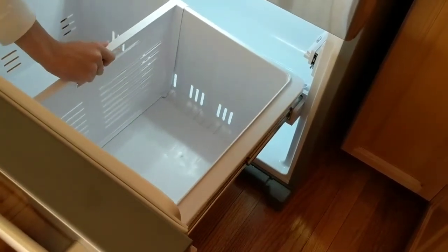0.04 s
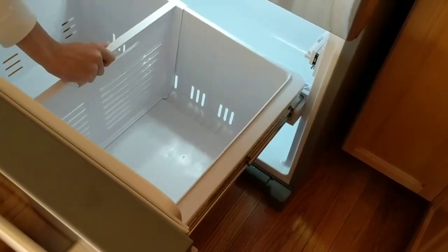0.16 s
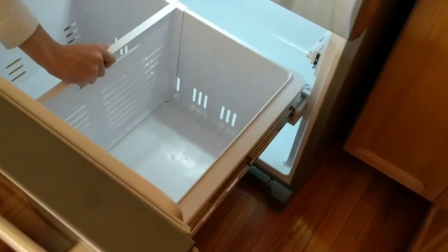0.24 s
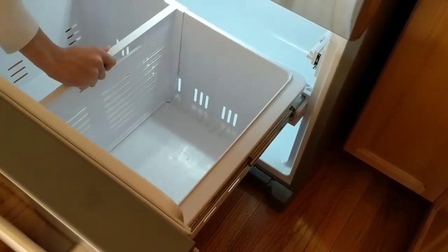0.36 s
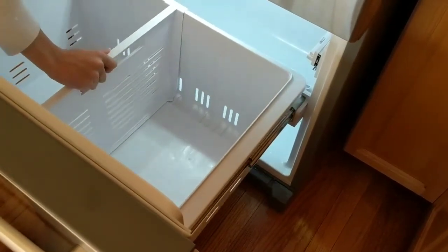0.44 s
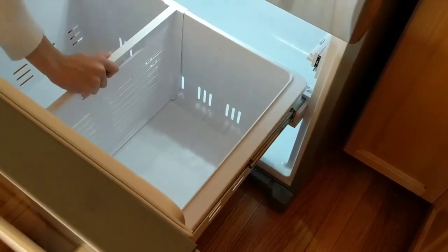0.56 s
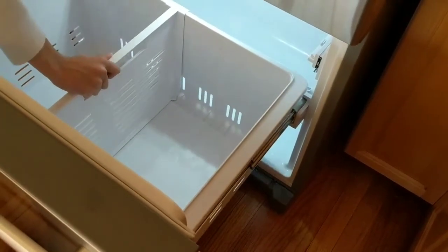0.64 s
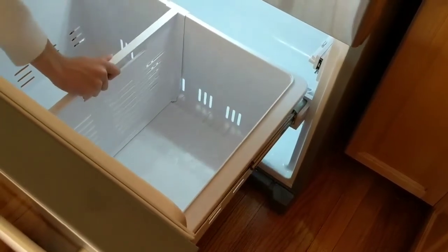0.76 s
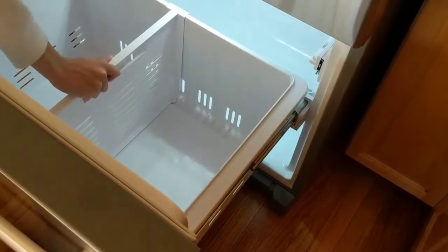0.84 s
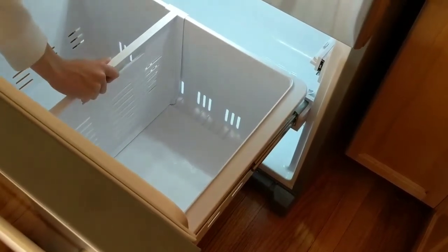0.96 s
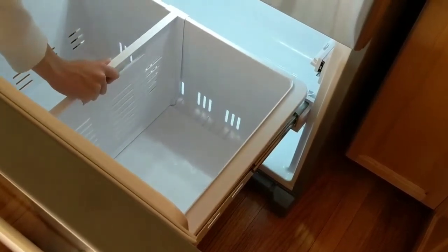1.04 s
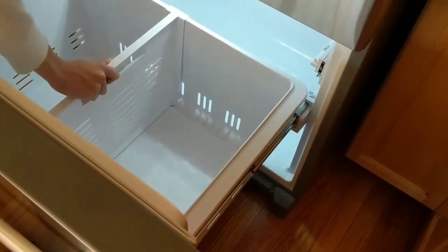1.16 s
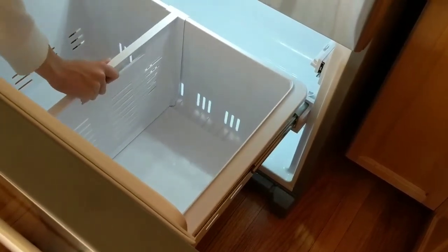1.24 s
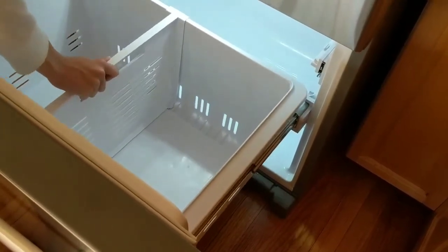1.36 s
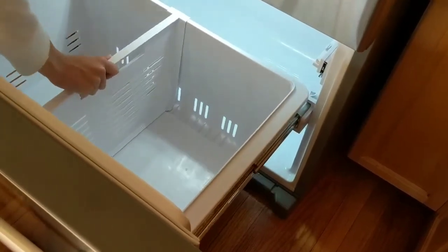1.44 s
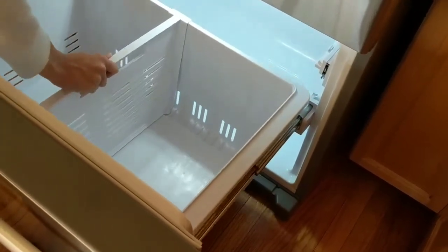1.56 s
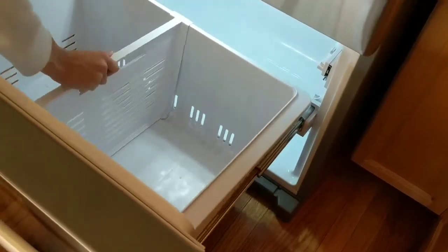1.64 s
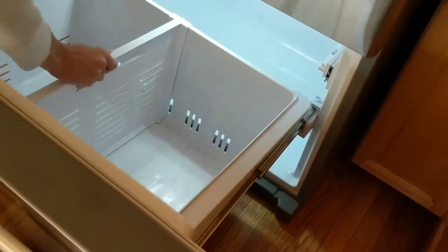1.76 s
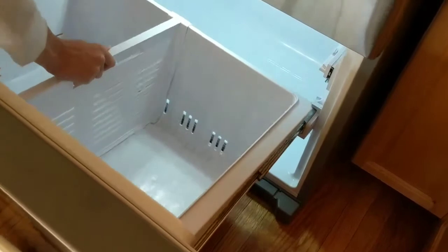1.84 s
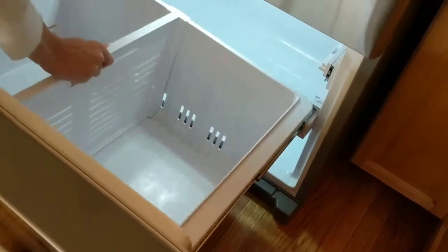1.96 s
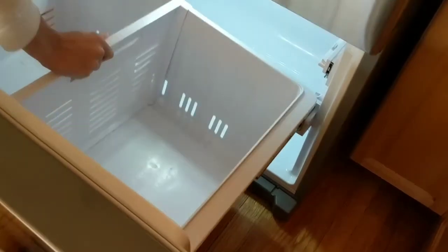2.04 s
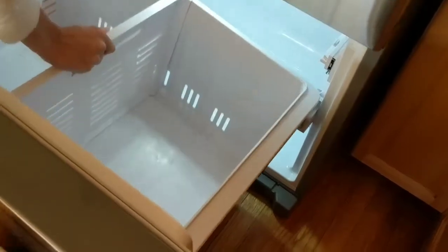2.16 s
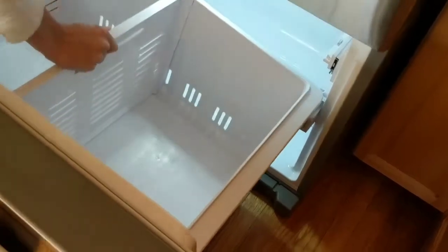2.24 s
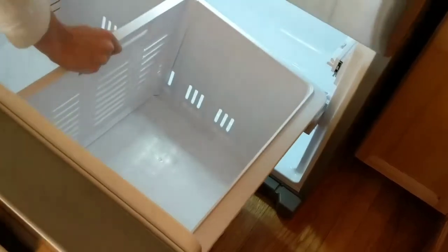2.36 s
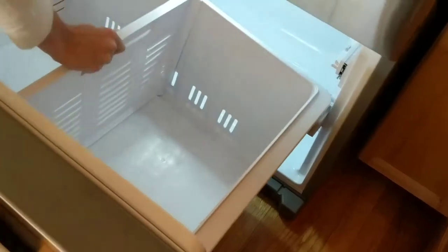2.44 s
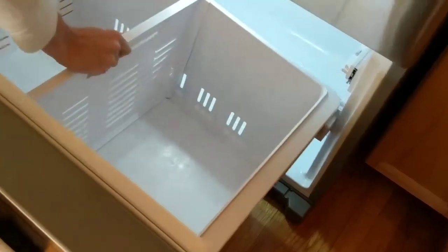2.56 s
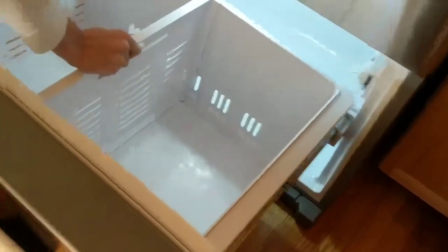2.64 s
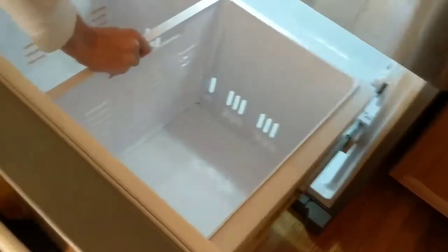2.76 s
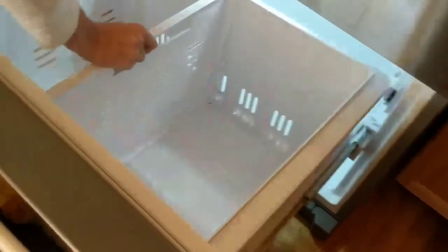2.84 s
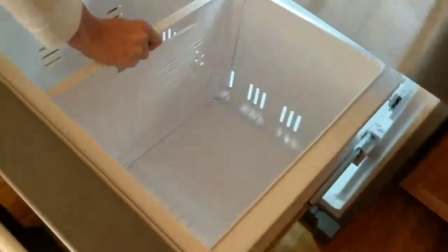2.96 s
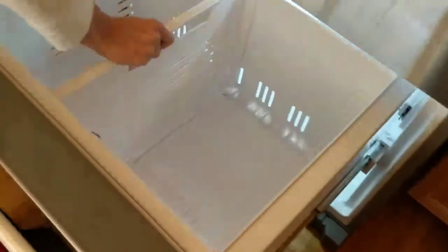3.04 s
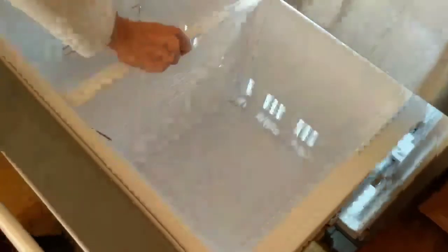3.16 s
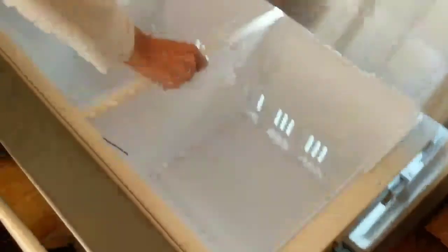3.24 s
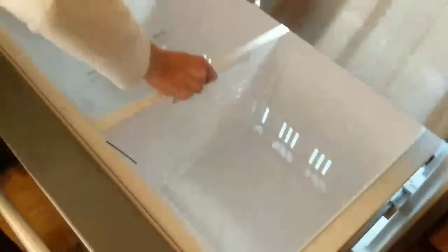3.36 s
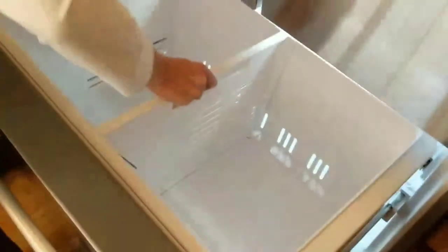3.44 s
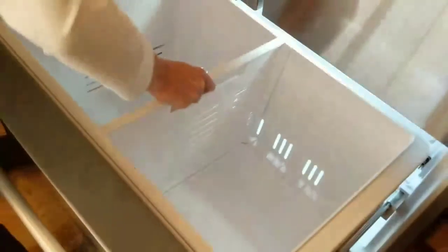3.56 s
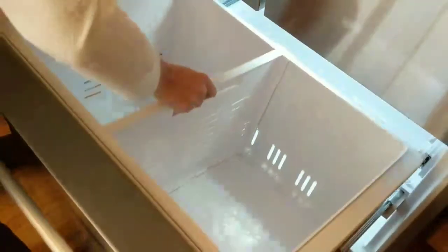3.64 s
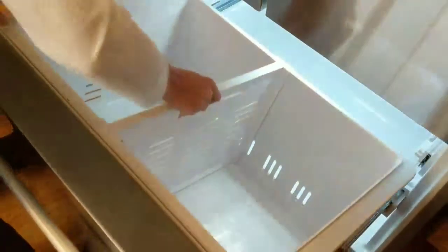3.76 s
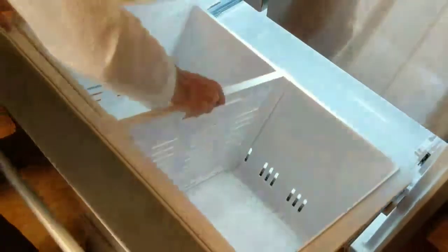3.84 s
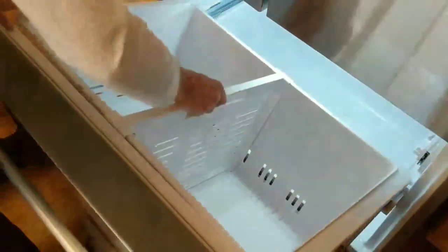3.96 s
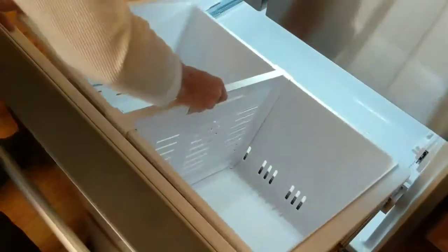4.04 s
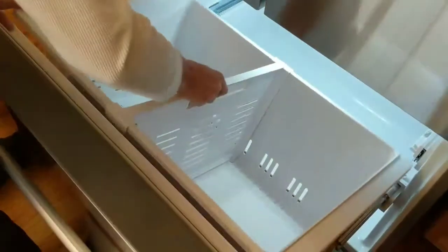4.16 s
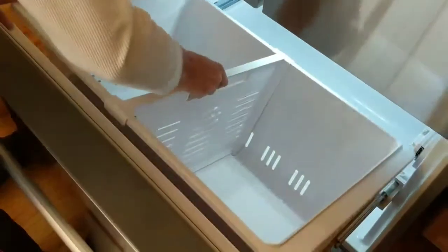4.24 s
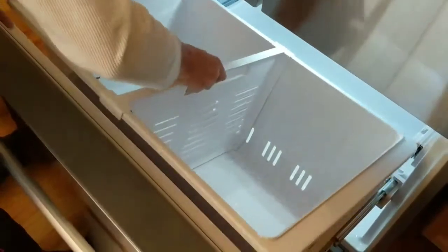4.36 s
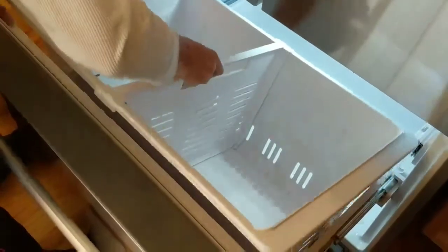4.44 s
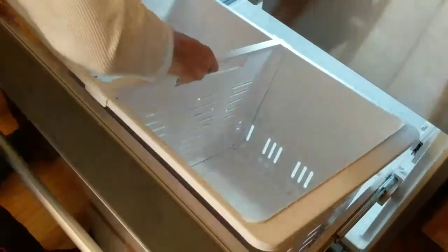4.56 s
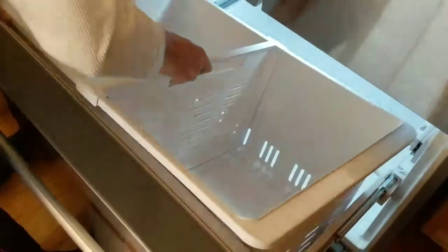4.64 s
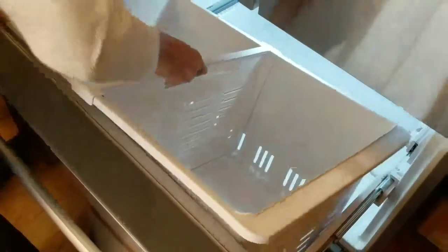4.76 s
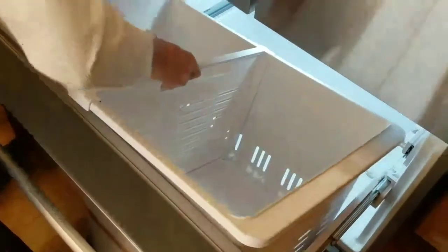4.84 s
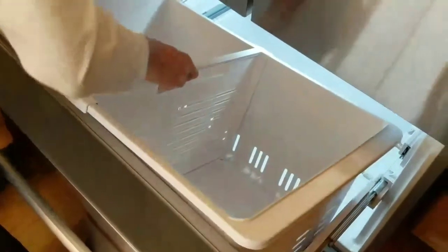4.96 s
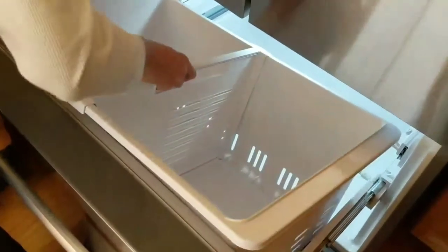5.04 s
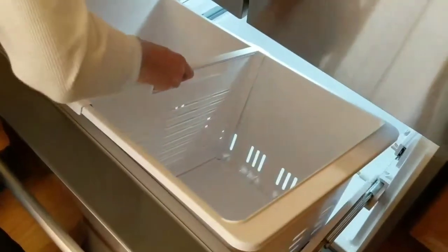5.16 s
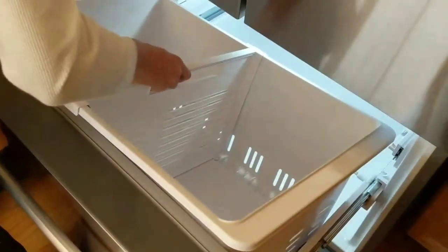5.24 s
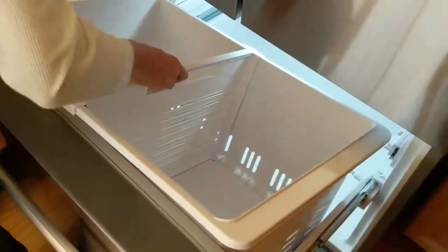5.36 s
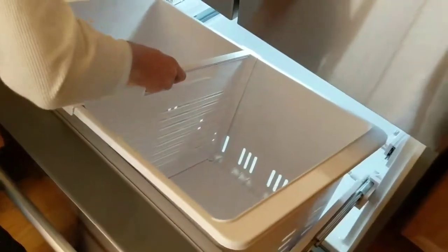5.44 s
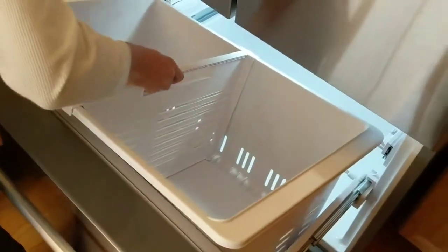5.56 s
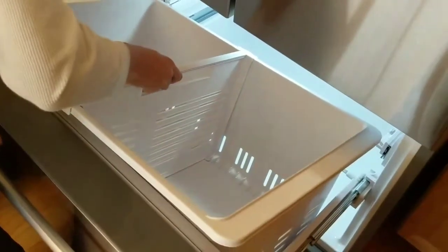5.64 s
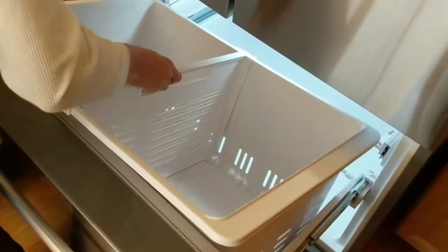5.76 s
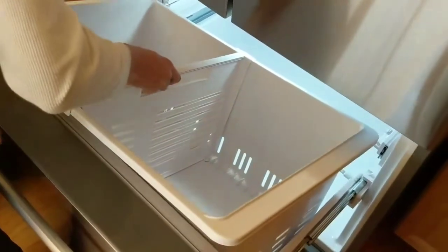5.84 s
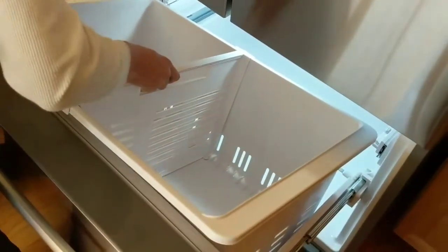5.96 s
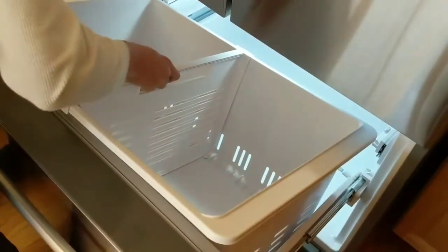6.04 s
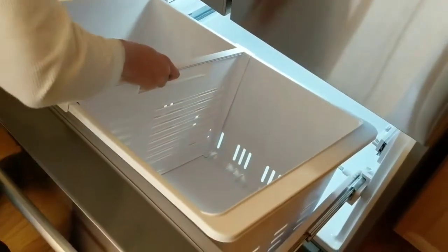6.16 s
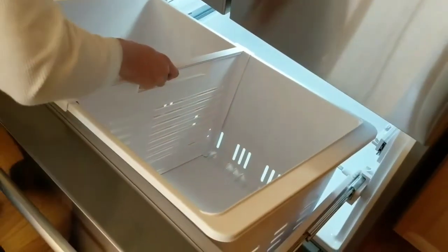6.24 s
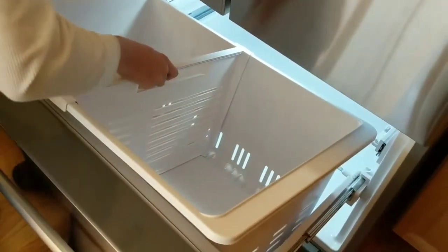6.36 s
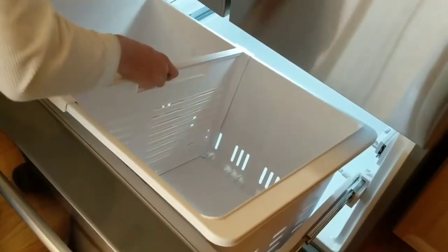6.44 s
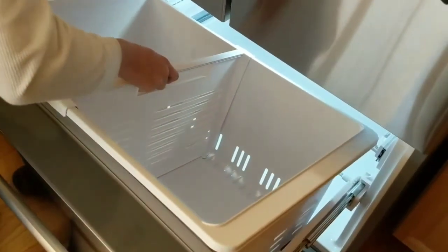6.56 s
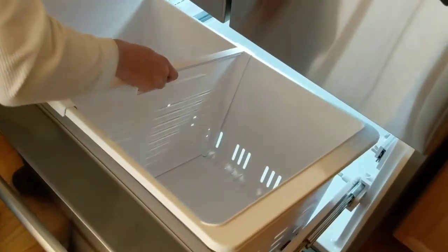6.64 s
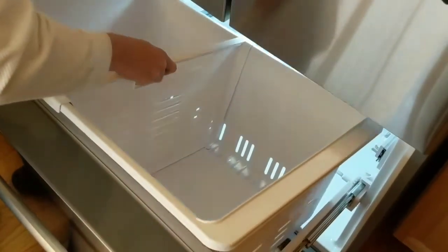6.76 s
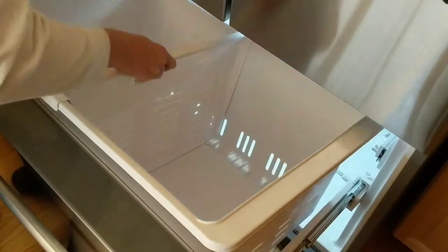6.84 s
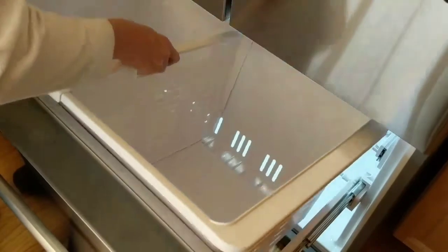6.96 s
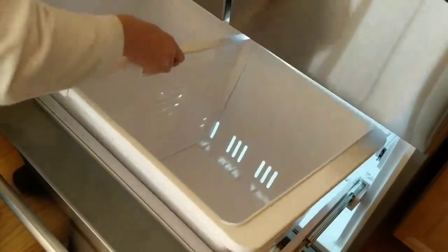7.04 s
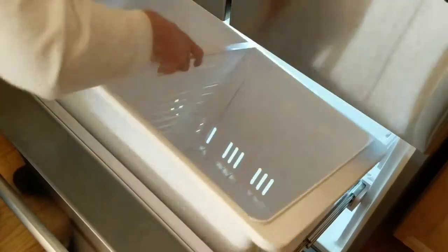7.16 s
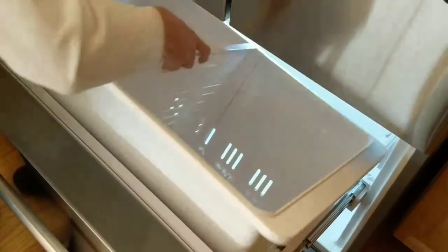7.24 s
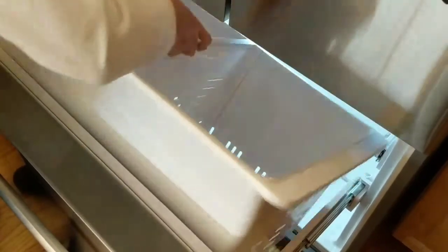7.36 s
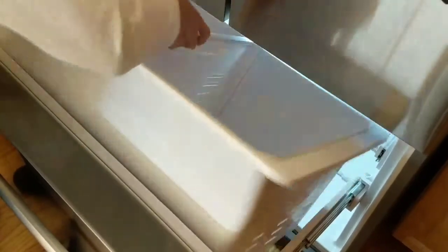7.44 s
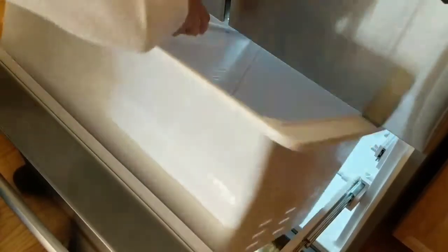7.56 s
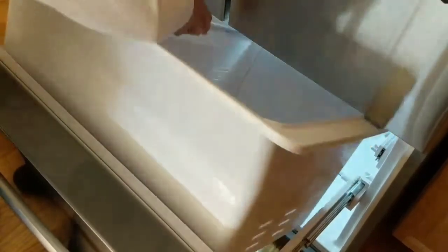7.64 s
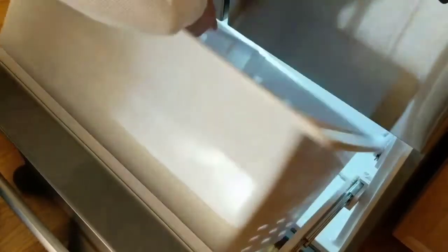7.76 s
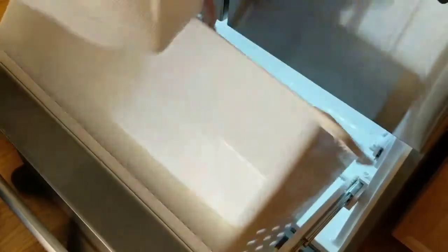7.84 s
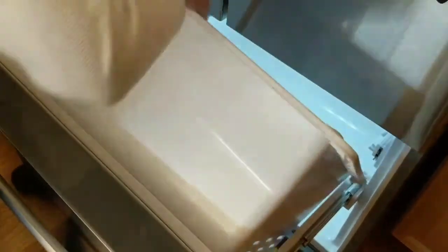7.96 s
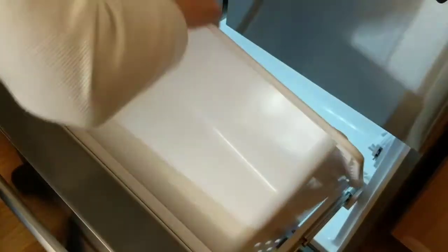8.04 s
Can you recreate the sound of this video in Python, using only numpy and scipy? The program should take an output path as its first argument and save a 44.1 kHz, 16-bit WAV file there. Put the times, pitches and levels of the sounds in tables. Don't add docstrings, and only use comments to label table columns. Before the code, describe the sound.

Close by in a small kitchen, a big plastic freezer basket is worked in its drawer frame. One hard knock comes early, then a rattling rock, a clattering pull and several hollow thumps. Light ticks and quiet rubbing fill a calmer stretch before a tilt and a dense, loud clatter as it lifts out. Faint compressor hum and soft fan air continue beneath.

```python
import sys
import numpy as np
from scipy import signal
from scipy.fft import rfft, irfft, next_fast_len
from scipy.io import wavfile
from scipy.ndimage import uniform_filter1d, map_coordinates

SR = 44100
rng = np.random.default_rng(int(sys.argv[2]) if len(sys.argv) > 2 else 0)


def master(y):
    cut = np.clip(np.atleast_2d(y).T, -1, 1)
    pcm = np.round(cut * 32767)
    wavfile.write(sys.argv[1], SR, pcm.astype(np.int16))


def how_loud(loudness_db):
    steps = np.asarray(loudness_db, float) / 20
    return 10 ** steps


N = 356901

# (time [s], crack peak [dB], brightness [dB], loudest rim tone [Hz])
KNOCKS = [(0.29, -36.5, -41, 970), (0.329, -21, -8, 1347), (1.813, -38, -34, 800), (1.901, -35, -11, 780),
          (1.935, -23.5, -30, 796), (2.339, -35.5, -10.5, 1650), (2.394, -32, -44, 800),
          (2.481, -35.5, -21.5, 885), (2.632, -39.5, -18.5, 1700), (2.72, -34.5, -8.5, 1610),
          (2.958, -33, -16, 1030), (3.098, -39.5, -23, 805), (3.641, -38.5, -18.5, 1080),
          (4.046, -38.5, -3, 1110), (4.055, -28.5, -13.5, 1987), (4.294, -36, -16.5, 1163),
          (4.437, -26, -12.5, 1536), (4.479, -39, -10, 1130), (4.496, -26, -14.5, 1630),
          (4.529, -35, -13.5, 1420), (4.623, -33, -20, 1700), (5.309, -39.5, -11.5, 1240),
          (5.333, -36, -14.5, 1047), (6.791, -31, -34, 1340), (6.873, -34, -12, 1630),
          (7.561, -24.5, -21.5, 1340), (7.648, -22, -10.5, 897), (7.637, -28, -18, 1030),
          (7.661, -27.5, -8, 1860), (4.564, -36.5, -27, 990)]
# (time [s], crack peak [dB], brightness [dB], loudest rim tone [Hz])
SCUFFS = [(0.096, -34, -18.5, 790), (0.715, -40, -16.5, 1760), (1.303, -55.5, -9.5, 1086),
          (1.618, -48.5, -16, 1630), (1.831, -41.5, -8.5, 816), (1.911, -32, -9.5, 1530),
          (2.846, -38.5, -15, 1520), (3.551, -39, -19.5, 1237), (4.025, -41.5, -15, 975),
          (4.234, -41, -12.5, 1700), (6.251, -40.5, -16, 1365), (6.662, -41.5, -34, 1034),
          (7.351, -37, -48, 1050), (7.403, -35, -17, 1090), (7.435, -34.5, -23, 1327),
          (7.549, -33.5, -41, 955), (7.61, -33, -15, 983)]
# (time [s], crack peak [dB], brightness [dB])
TICKS = [(0.571, -44, -15), (0.622, -44.5, -16), (0.664, -50, -28), (1.084, -55, -6.5), (1.485, -50, -12),
         (1.551, -41.5, -21), (1.672, -45.5, -23), (2.587, -54, -3.5), (2.918, -42, -26), (3.332, -56, -8),
         (3.408, -72, -9), (3.472, -51.5, -39), (3.606, -50, -10), (3.794, -46.5, -31), (4.759, -47.5, -28),
         (4.883, -50, -26), (5.058, -46, -22), (5.749, -59.5, 2.5), (5.856, -49, -20), (6.012, -40, -26),
         (6.071, -44.5, -19), (6.326, -44, -36), (6.704, -43, -12), (7.014, -56, 5), (7.981, -58, -6),
         (8.019, -51, -19)]
# (time [s], peak [dB], centre [Hz], top air [dB])
SNAPS = [(0.326, -23.5, 1200, -40), (0.3314, -25.5, 5600, -43), (0.7175, -46, 2550, -40),
         (1.8323, -55, 3880, -40), (1.9131, -33.5, 3560, -11), (1.9322, -36, 3730, -35),
         (2.0258, -37, 3430, -35), (2.3384, -45, 4260, -13), (2.427, -49.5, 3850, -35),
         (2.7204, -36, 6400, -16), (2.8453, -39, 1800, -22), (2.879, -46, 2500, -38),
         (2.9188, -46, 6430, -39), (2.9575, -39, 5000, -22), (3.0967, -44, 1490, -35),
         (4.052, -30.5, 2600, -45), (4.435, -36.5, 2370, -21), (4.4955, -27, 1900, -21),
         (4.527, -42, 3000, -30), (4.6246, -35, 2600, -40), (6.755, -51, 3900, -40),
         (6.7909, -36, 1085, -40), (6.8713, -33, 1717, -20), (7.013, -46, 3700, -36),
         (7.1374, -41.5, 2510, -35), (7.4134, -42.5, 2470, -24), (7.5627, -42, 2840, -35),
         (7.6106, -41, 7900, -25), (7.6335, -43, 4200, -22), (7.6507, -29, 8750, -20),
         (7.662, -30, 5620, -17), (7.674, -38, 1465, -19), (7.712, -31, 1810, -35), (7.746, -48, 2600, -35),
         (7.803, -35, 1395, -35), (7.845, -39, 1610, -37), (7.979, -46, 8200, -14),
         (0.336, -24.5, 5660, -48), (0.347, -37, 5400, -50), (0.362, -44, 5900, -45),
         (0.382, -49, 5450, -45), (5.309, -46, 2040, -40), (3.41, -54, 7000, -30)]
# (time [s], peak [dB], body
# tone [Hz])
CLACKS = [
    (0.329, -23.5, 1317),
    (0.451, -39, 780),
    (0.573, -57, 606),
          (1.796, -51, 585),
    (1.813, -36.5, 750),
    (1.835, -38, 610),
    (1.855, -35, 640),
    (1.91, -42, 597),
    (1.912, -43, 1030),
    (1.917, -37, 1060),
    (1.932, -28, 823),
    (1.969, -31, 853),
    (2.081, -38, 1850),
          (2.72, -32, 1550),
    (2.833, -49, 1600),
    (2.846, -39, 826),
    (2.883, -41, 1425),
    (2.918, -42, 816),
    (2.939, -37, 734),
    (2.957, -30, 1300),
    (2.999, -46, 600),
          (6.791, -29.5, 664),
    (6.872, -34.5, 1776),
    (7.001, -50, 1730),
    (7.045, -51, 2250),
          (7.552, -27, 990),
    (7.563, -25, 1310),
    (7.595, -30, 1276),
    (7.623, -25, 930),
    (7.636, -25, 916),
    (7.703, -32.5, 1105),
    (7.751, -30, 1310),
    (7.846, -36.5, 882),
    (7.905, -39, 960),
    (7.925, -46, 627),
          (0.101, -36, 566), (0.714, -35, 444), (1.672, -35, 426), (2.34, -47, 433), (2.743, -38, 433),
               (2.764, -38, 438), (4.053, -25.5, 478), (4.089, -30, 587), (4.232, -35, 435),
               (4.449, -29, 471), (4.509, -43, 436), (4.569, -43, 431), (4.639, -43, 426), (4.9, -42, 450),
               (5.309, -41, 426), (6.251, -44, 940), (6.665, -45, 435), (6.899, -42, 436),
               (7.413, -34, 527), (4.447, -31, 1470), (4.495, -28, 1515), (4.624, -31.5, 1583),
               (6.885, -37, 1600), (6.905, -40, 1860), (2.74, -35, 1110), (2.76, -42.5, 1990),
               (2.975, -38, 1700), (7.44, -31, 1340), (7.415, -29, 1004)]
# (time [s], wall peak [dB], box thump [dB], loudest wall tone [Hz])
DAMPED_BOOMS = [(0.114, -23.5, -24, 246.6), (0.335, -17.5, -10, 262), (0.725, -28, -10, 151),
                (1.086, -38, -16, 225), (1.575, -35, -23, 194), (1.624, -42.5, -23, 260),
                (1.675, -38.5, -12, 275), (1.937, -20, -6.5, 240), (2.355, -30, 2.5, 213),
                (2.488, -39, -2, 400), (2.637, -37, -30, 258), (2.725, -29, -2, 200),
                (2.751, -20.5, -22, 234), (2.947, -27, 2, 203), (3.053, -40, 8, 203),
                (3.102, -33.5, -12, 222.5), (3.796, -42.5, 1, 390), (4.054, -52, -29, 137),
                (4.054, -23, -39, 201.5), (4.89, -45.5, -17, 143), (5.313, -25.5, -9.5, 205),
                (6.253, -36.5, -0.5, 219), (6.333, -40.5, -9, 204), (6.794, -28, 1.5, 184),
                (7.158, -42.5, -34, 208), (7.363, -27, -13, 182), (7.92, -35.5, -17, 229),
                (4.508, -20.5, -6, 207), (2.832, -30, -23, 199)]
# (time [s], wall peak [dB], box thump [dB], loudest wall tone [Hz])
FREE_BOOMS = [(0.29, -44, -13, 283), (1.489, -56, -15, 154), (1.819, -31.5, -33, 272), (2.061, -56, 3, 263),
              (2.403, -38, -26, 206), (3.339, -39.5, -13, 196), (3.471, -36, 5.5, 213),
              (4.238, -34.5, -39, 183.4), (4.443, -24.5, -12, 265), (4.621, -37, -13, 201.3),
              (5.449, -42, -23, 231), (5.865, -49.5, -32, 229.4), (5.979, -57, -18, 147),
              (6.662, -44, -26, 154), (6.711, -36.5, -13, 146), (6.894, -33, 11, 176),
              (7.002, -35, -7, 211.6), (7.12, -41.5, 2, 225.3), (7.406, -20, -6.5, 198.3),
              (7.549, -20, -32, 213.3), (7.989, -39.5, 4, 134.5), (8.026, -44.5, 15, 151)]
# (time [s], peak [dB], tone
# [Hz])
PANELS = [(0.336, -21, 250), (0.379, -26, 235), (2.787, -18, 191), (2.846, -25, 208), (2.923, -20, 213),
          (4.465, -16.5, 258), (4.659, -28, 202), (6.792, -38, 186), (7.002, -29, 210), (7.68, -18.5, 177),
          (7.705, -29, 240), (7.774, -22, 217), (7.797, -18, 217), (7.822, -32, 232), (7.849, -17, 209),
          (7.36, -31, 156), (7.41, -20, 140), (7.45, -33, 120), (3.8, -33.5, 68), (4.55, -40, 72),
              (1.72, -33, 120), (0.45, -44, 150), (7.612, -24.5, 265), (7.64, -22, 320), (7.436, -31, 200),
              (2.948, -22, 214), (2.5, -20, 204), (1.934, -22.5, 192), (7.43, -23, 140), (4.6, -38, 58),
              (4.5, -28, 290)]
# (middle [s], length [s], level [dB], rasp centre [Hz], width [octaves])
SLIDES = [(1.149, 0.041, -57.5, 5000, 7.5), (1.926, 0.0079, -38, 3000, 1.3),
          (2.052, 0.036, -45.5, 3200, 1.5), (2.296, 0.023, -52, 5000, 2.6), (0.39, 0.057, -58, 4500, 0.64),
          (4.063, 0.016, -44.5, 2620, 0.62), (4.561, 0.054, -56.5, 1400, 1.6), (6.04, 0.04, -54, 2300, 0.7),
          (6.03, 0.05, -58, 8500, 0.4), (6.917, 0.031, -52.5, 1690, 0.25),
          (7.151, 0.017, -48.5, 2730, 1.04), (7.651, 0.014, -39, 4500, 2.9),
          (7.757, 0.008, -46.5, 3500, 1.5), (7.8, 0.052, -51, 1390, 0.6), (7.985, 0.0048, -46.5, 6800, 0.5)]
# (peak time [s], length [s], scrape [dB], brightness [dB])
RUBS = [(0.0, 0.032, -40, -9), (0.442, 0.3, -51.5, -5), (1.875, 0.053, -91, -36),
        (1.999, 0.14, -39.5, -2.5), (2.313, 1, -73.5, 9.5), (2.779, 0.1, -51, -4), (2.95, 0.056, -48, 2),
        (3.155, 0.17, -68.5, -6), (4.183, 0.21, -63, -4), (4.71, 0.54, -68.5, -5), (6.068, 0.35, -64.5, 0),
        (6.698, 0.089, -51, 1), (6.924, 0.21, -60.5, 8.5), (7.138, 0.042, -72, -10), (7.437, 0.045, -69, 5),
        (7.635, 0.096, -38.5, 5), (7.747, 0.16, -43.5, -28), (7.826, 0.17, -50.5, 1.5),
        (8.09, 0.38, -58, -15)]
# (peak time [s], length [s], wall [dB], box [dB])
SHOVES = [(0.0, 0.054, -30, -40), (0.196, 0.82, -56, -56), (0.46, 0.22, -46, -45), (0.67, 0.18, -53, -61),
          (1.572, 0.11, -42.5, -62), (1.705, 0.065, -50, -45.5), (1.86, 0.052, -49, -68),
          (1.952, 0.17, -34, -41), (2.778, 0.091, -51, -48), (2.848, 0.1, -33, -33.5),
          (2.975, 0.07, -36, -42), (3.15, 0.25, -56.5, -55), (3.594, 0.3, -49.5, -54),
          (4.112, 0.058, -48, -66), (4.302, 0.082, -41.5, -54), (4.51, 0.2, -73, -40),
          (4.627, 0.25, -43.5, -46), (5.4, 0.13, -42, -54), (6.72, 0.074, -51, -66),
          (6.845, 0.064, -46, -64), (6.942, 0.15, -41, -59), (7.023, 0.066, -67, -52),
          (7.382, 0.04, -59, -38.5), (7.457, 0.074, -38, -51), (7.565, .07, -55, -42.5),
          (7.645, 0.16, -29.5, -33.5), (7.824, 0.11, -32.5, -37.5), (8.09, 0.27, -46.5, -55)]
# (centre [Hz], width [Hz], level [dB])
WALL_MODES = [(144, 24.5, -3), (193.9, 34, 3), (225, 49.2, 2), (275, 34.8, -3), (356.7, 34, -7.5),
              (418, 25.7, -7), (504, 21, -17.5), (586, 115, -20.5)]
# (centre [Hz], width [Hz], level [dB])
BOX_MODES = [(69.86, 6.1, 0), (89.3, 14, -16.5)]
# (frequency [Hz], level [dB per Hz])
RIM_COLOUR = [(290, 3.5), (500, 1.5), (733, -4), (937, -4.5), (1990, -3.5), (2980, -12.5), (3550, -8.5),
              (4770, -13), (5590, -9), (8820, -19), (9500, -15), (12400, -63), (20900, -120)]
# (centre [Hz], width [Hz], level [dB])
RIB_MODES = [(940, 140, -26), (1310, 47, -33), (1700, 76, -37), (2060, 76, -46), (3920, 350, -6.5),
             (5600, 100, 4), (8590, 730, 14)]
# (frequency [Hz], t60 [s])
KITCHEN_T60 = [(100, 0.37), (1000, 0.4), (4000, 0.29), (10000, 0.2)]
# (frequency [Hz], level [dB])
HUM = [(61.2, -53.5), (126, -70.5), (268, -79.5), (429, -75.5)]
# (frequency [Hz], level [dB per Hz])
AIR = [(15, -40), (25, -31.5), (70, 16.5), (89, -27), (107, -19), (216, -21), (267, -12), (332, -28),
       (423, -33), (724, -42), (1080, -16), (1380, -24), (1810, -18), (8620, -30), (15600, -37.5)]
# (frequency [Hz], gain [dB])
MIC = [(30, -5), (55, 5), (9500, -6), (10200, -16.5), (11000, -27), (16000, -26.5)]

KNOCK_T60_S, SCUFF_T60_S, TICK_T60_S = 0.064, 0.14, 0.058
KNOCK_RISE_S, SCUFF_RISE_S, TICK_RISE_S = 0.0015, 0.0007, 0.00061
TICK_HZ, TICK_SPREAD = 1076, 0.11
STIFF_HZ, CRACK_LOW_HZ = 1130, 570
SNAP_T60_S, SNAP_OCTAVES, SNAP_RING_DB, SNAP_RING_T60_S = 0.023, 0.42, -6, 0.062
AIR_T60_S, AIR_LOW_HZ = 0.017, 10200
DAMPED_T60_S, FREE_T60_S = 0.12, 0.32
CHATTER_PER_S, CHATTER_DB = 260, -4.5
FADE_DB, LINGER = 27.5, 1.184
REST_SCRAPE_DB, REST_BRIGHT_DB, REST_WALL_DB, REST_BOX_DB = -67, 1, -72, -87


def unit(x):
    return x / np.sqrt(np.mean(x ** 2) + 1e-20)


def along(points, hz):
    f, v = np.transpose(points)
    return np.interp(np.log(hz + 1), np.log(f + 1), v)


def wobble(rate_hz):
    return map_coordinates(rng.standard_normal(N // 40), [np.arange(N) * rate_hz / SR])


def filtered(x, response):
    m = next_fast_len(N + SR // 4)
    return irfft(rfft(x, m) * response(np.fft.rfftfreq(m, 1 / SR)), m)[..., :N]


def place(out, start_s, sound):
    out[round(start_s * SR):][:len(sound)] += sound


def decay(t, db, t60_s, rise_s):
    return (1 - np.exp(-t / rise_s)) * how_loud(db - 60 * t / t60_s)


def modes(table):
    def response(f):
        total = 0
        for k, (centre, width, db) in enumerate(table):
            band = 1j * f * width
            total = total + (-1) ** k * how_loud(db) * band / (centre * centre - f * f + band)
        return total
    return response


def rim(f):
    return how_loud(along(RIM_COLOUR, np.minimum(f, 9000))) * (1 + 0.5 * modes(RIB_MODES)(f))


def strokes(s, length_s, db, rest_db):
    t = np.arange(0, N + 64, 64) / SR
    lag = (t - s[:, None]) / length_s[:, None]
    fall = FADE_DB * np.where(lag < 0, -lag, lag / LINGER)
    gain = how_loud(db[:, None] - fall).sum(0) + how_loud(rest_db)
    return np.interp(np.arange(N) / SR, t, gain)


def cracks():
    t = np.arange(SR // 6) / SR
    dull, bright, tone = np.zeros((3, N + SR))
    contacts = [(*row, KNOCK_T60_S, KNOCK_RISE_S) for row in KNOCKS]
    contacts += [(*row, SCUFF_T60_S, SCUFF_RISE_S) for row in SCUFFS]
    for row in TICKS:
        tick_hz = TICK_HZ * np.exp(TICK_SPREAD * rng.normal())
        contacts.append((*row, tick_hz, TICK_T60_S, TICK_RISE_S))
    for s, db, bright_db, hz, t60_s, rise_s in contacts:
        noise = rng.standard_normal((3, len(t)))
        shape = decay(t, db, t60_s, rise_s * STIFF_HZ / hz)
        place(dull, s, shape * noise[0])
        place(bright, s, how_loud(bright_db) * shape * noise[1])
        place(tone, s, shape * np.sin(2 * np.pi * hz * t + 0.08 * np.cumsum(noise[2])))

    def low(f):
        return 1 / (1 + 1j * f / 3200) ** 2

    burst = how_loud(10.5) * filtered(dull[:N], lambda f: rim(f) * low(f) * 1j * f / (CRACK_LOW_HZ + 1j * f))
    burst += how_loud(19) * filtered(bright[:N], lambda f: rim(f) * (1 - low(f)))
    return burst + how_loud(-10.5) * tone[:N]


def snaps():
    out, t = np.zeros(N + SR), np.arange(3072) / SR
    hz = np.fft.rfftfreq(len(t), 1 / SR)
    air_colour = (hz > AIR_LOW_HZ) * how_loud(-1.3 * (hz - AIR_LOW_HZ) / 1000)
    for s, db, centre_hz, air_db in SNAPS:
        noise = rfft(rng.standard_normal((2, len(t))))
        octaves = np.log2((hz + 1) / centre_hz)
        colour = np.exp(-0.5 * (octaves / SNAP_OCTAVES) ** 2) * (hz < AIR_LOW_HZ - 500)
        crack = unit(irfft(noise[0] * colour)) * how_loud(-60 * t / SNAP_T60_S)
        ring = how_loud(SNAP_RING_DB - 60 * t / SNAP_RING_T60_S) * np.sin(2 * np.pi * centre_hz * t)
        air = unit(irfft(noise[1] * air_colour)) * how_loud(air_db - 60 * t / AIR_T60_S)
        place(out, s, how_loud(db - 4.5) * (1 - np.exp(-t / 0.00053)) * (crack + air + ring))
    return out[:N]


def clacks():
    partners = [(1, -0.5), (1.37, -7), (0.71, -7.5)]  # (share of the tone, level [dB])
    out, t = np.zeros(N + SR), np.arange(SR // 10) / SR
    for s, db, hz in CLACKS:
        ring = np.zeros(len(t))
        for share, level_db in partners:
            rough = 0.064 * np.cumsum(rng.standard_normal(len(t)))
            ring += how_loud(level_db) * np.sin(2 * np.pi * share * hz * t + rough)
        place(out, s, decay(t, db - 7, t60_s=0.057, rise_s=0.00043) * ring)
    return out[:N]


def booms():
    t = np.arange(SR // 4) / SR
    push = t / 0.0068 * np.exp(-t / 0.0073)
    shove = t / 0.0033 * np.exp(-t / 0.0027)
    walls, box, tone = np.zeros((3, N + SR))
    blows = [(*row, DAMPED_T60_S) for row in DAMPED_BOOMS] + [(*row, FREE_T60_S) for row in FREE_BOOMS]
    for s, db, box_db, hz, t60_s in blows:
        start_s = s - 0.003
        rough = 0.038 * np.cumsum(rng.standard_normal(len(t)))
        place(walls, start_s, how_loud(db) * push * rng.standard_normal(len(t)))
        place(box, start_s, how_loud(db + box_db) * rng.choice([-1, 1]) * shove)
        place(tone, start_s, decay(t, db, t60_s, rise_s=0.0015) * np.sin(2 * np.pi * hz * t + rough))
    wall_boom = how_loud(23.5) * filtered(walls[:N], modes(WALL_MODES))
    box_thump = how_loud(22) * filtered(box[:N], modes(BOX_MODES))
    return wall_boom + box_thump + how_loud(-4.5) * tone[:N]


def panels():
    out, t = np.zeros(N + SR), np.arange(SR // 6) / SR
    for s, db, hz in PANELS:
        place(out, s, decay(t, db - 2, t60_s=0.091, rise_s=0.0066) * np.sin(2 * np.pi * hz * t))
    return out[:N]


def slides():
    out, hz = np.zeros(N + SR), np.fft.rfftfreq(SR // 2, 1 / SR)
    t = (np.arange(SR // 2) - SR // 4) / SR
    for s, length_s, db, centre_hz, octaves in SLIDES:
        clumps = uniform_filter1d(rng.standard_normal(len(t)), size=90)
        grit = how_loud(1.6 * unit(clumps)) * rng.standard_normal(len(t))
        colour = np.exp(-0.5 * (np.log2((hz + 1) / centre_hz) / octaves) ** 2)
        swell = how_loud(db) * np.exp(-0.5 * (t / length_s) ** 2)
        place(out, s - 0.25, swell * unit(irfft(rfft(grit) * colour)))
    return out[:N]


def scrape():
    grit = how_loud(1.5 * wobble(60) + 2.2 * wobble(500)) * rng.standard_normal(N)
    catches = (rng.random(N) < CHATTER_PER_S / SR) * how_loud(5 * rng.standard_normal(N))
    chatter = signal.lfilter([1], [1, -0.97], catches) * rng.standard_normal(N)
    grit = unit(grit) + how_loud(CHATTER_DB) * unit(chatter)
    dull = unit(filtered(grit, lambda f: rim(f) / (1 + (f / 3000) ** 4)))
    bright = unit(filtered(grit, lambda f: rim(f) / (1 + (3000 / (f + 1)) ** 4)))
    s, length_s, db, bright_db = np.transpose(RUBS)
    dull_gain = strokes(s, length_s, db, REST_SCRAPE_DB)
    bright_gain = how_loud(-6.5) * strokes(s, length_s, db + bright_db, REST_SCRAPE_DB + REST_BRIGHT_DB)
    return dull_gain * dull + bright_gain * bright


def judder():
    slips = how_loud(2.8 * wobble(45)) * rng.standard_normal((2, N))
    s, length_s, wall_db, box_db = np.transpose(SHOVES)
    walls = strokes(s, length_s, wall_db, REST_WALL_DB) * unit(filtered(slips[0], modes(WALL_MODES)))
    box = strokes(s, length_s, box_db, REST_BOX_DB) * unit(filtered(slips[1], modes(BOX_MODES)))
    return walls + box


def kitchen(x):
    out, step = np.zeros(N + SR), SR // 3
    for i in range(0, N, step):
        hz, t, z = signal.stft(rng.standard_normal(SR // 2), SR, nperseg=256)
        fall_db = -60 * t / along(KITCHEN_T60, hz)[:, None]
        tail = signal.istft(z * how_loud(fall_db), SR, nperseg=256)[1]
        wet = signal.fftconvolve(x[i:i + step], tail / np.linalg.norm(tail))
        out[i + 220:][:len(wet)] += wet
    return out[:N]


def freezer():
    t = np.arange(N) / SR
    hum = np.zeros(N)
    for hz, db in HUM:
        hum += how_loud(db + 3.0 + 0.37 * wobble(11.0)) * np.sin(2 * np.pi * hz * t + 0.075 * wobble(3.1))
    air = unit(filtered(rng.standard_normal(N), lambda f: how_loud(along(AIR, f))))
    z = signal.stft(air, nperseg=512)[2]
    patches = uniform_filter1d(rng.standard_normal(z.shape), size=6, axis=0)
    patches = uniform_filter1d(patches, size=12, axis=1)
    air = unit(signal.istft(z * how_loud(1.3 * unit(patches)), nperseg=512)[1][:N])
    drift = how_loud(0.85 * wobble(2.4))
    return how_loud(2.5) * hum + how_loud(-61) * drift * air


def scene():
    boom = booms()
    rim_sound = cracks() + scrape() + slides()
    room = kitchen(how_loud(-6.5) * rim_sound + how_loud(-6.5) * boom)
    near = rim_sound + boom + judder() + room
    heard = filtered(near, lambda f: how_loud(along(MIC, f)))
    return (heard + freezer() + snaps() + panels() + clacks())[None]


def band_limit(x):
    return signal.sosfilt(signal.butter(12, 15740, fs=SR, output="sos"), x)


def record(dry):
    top = 0.4
    rounded = dry / (1 + np.abs(dry / top) ** 4) ** (1 / 4)
    return band_limit(rounded)


dry = scene()
out = record(dry)
master(out)
```